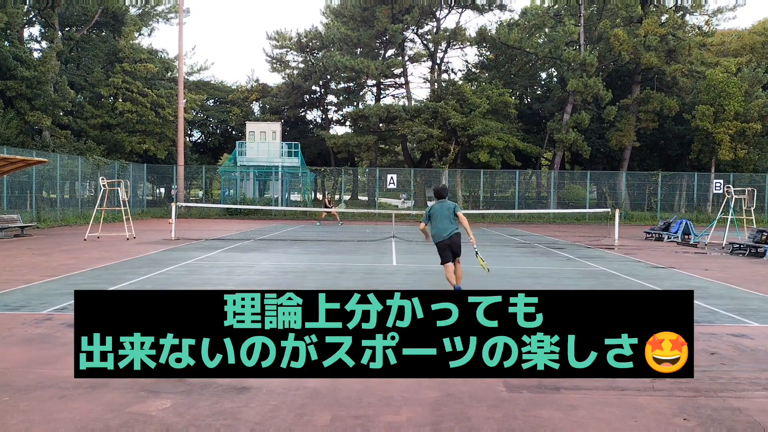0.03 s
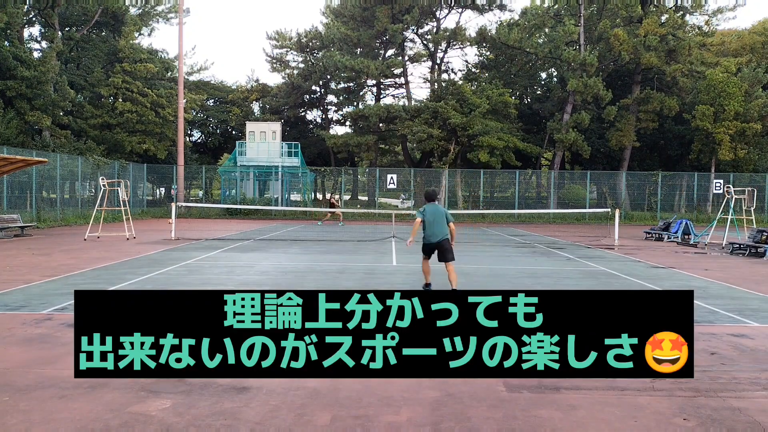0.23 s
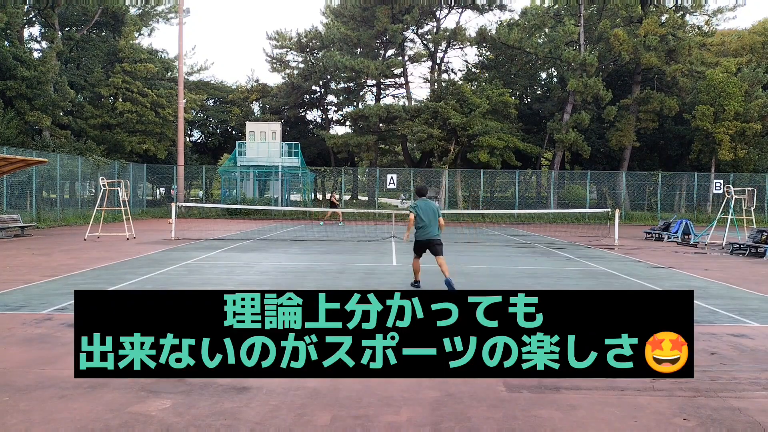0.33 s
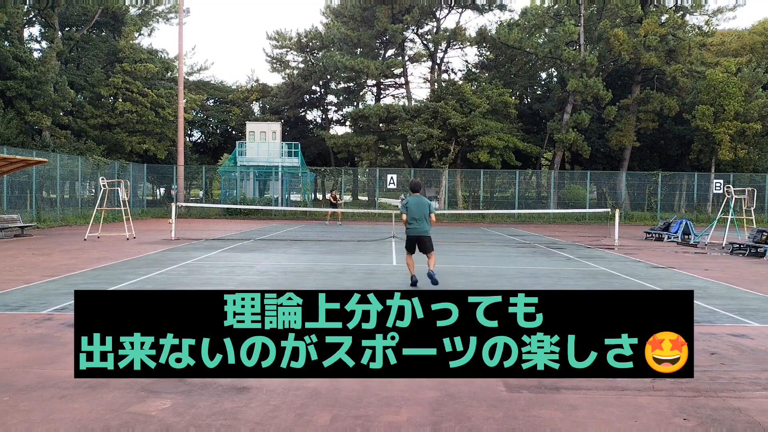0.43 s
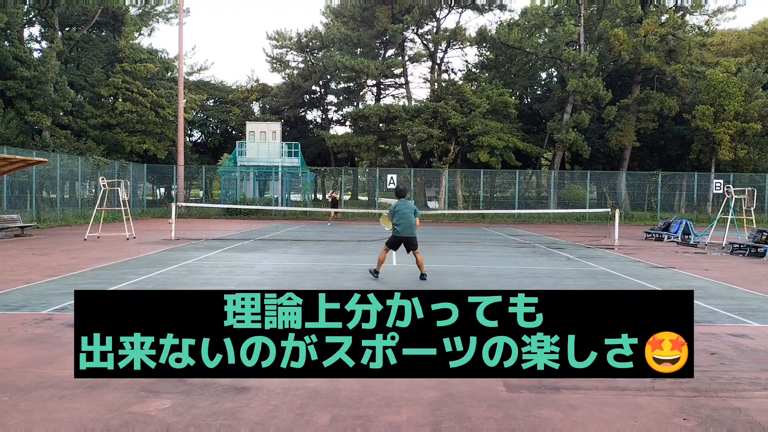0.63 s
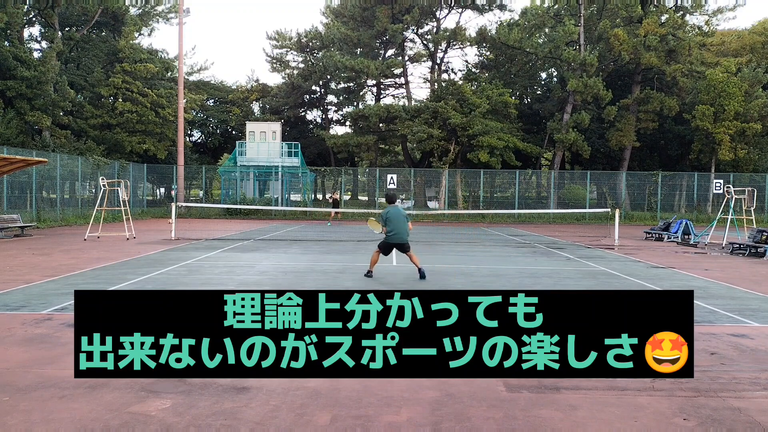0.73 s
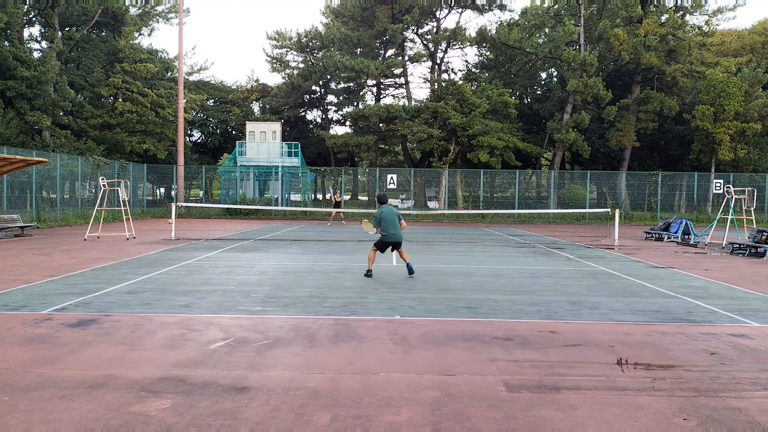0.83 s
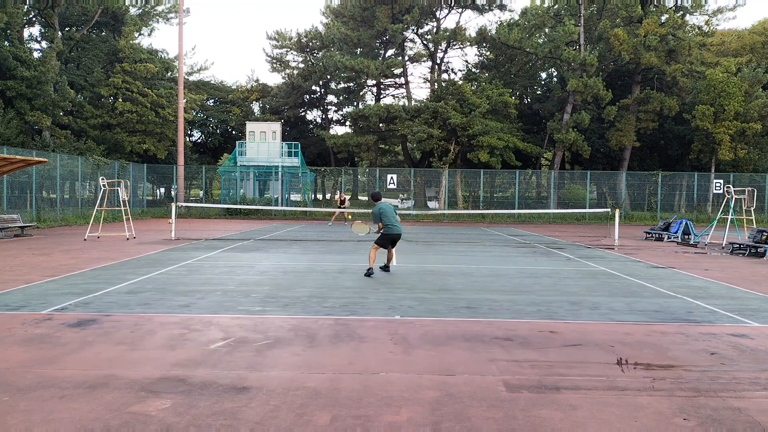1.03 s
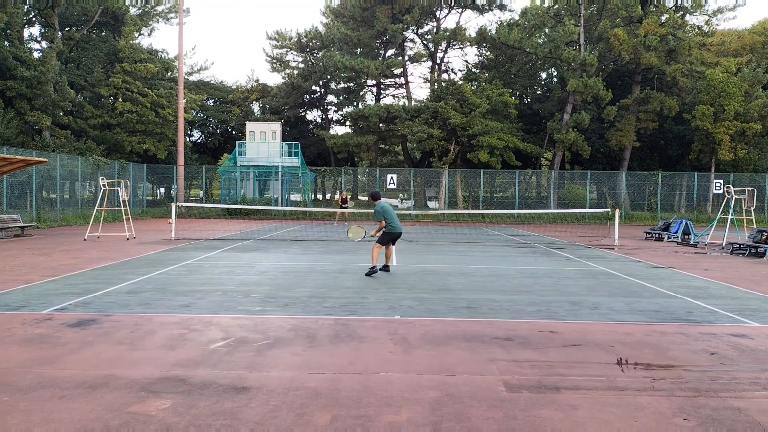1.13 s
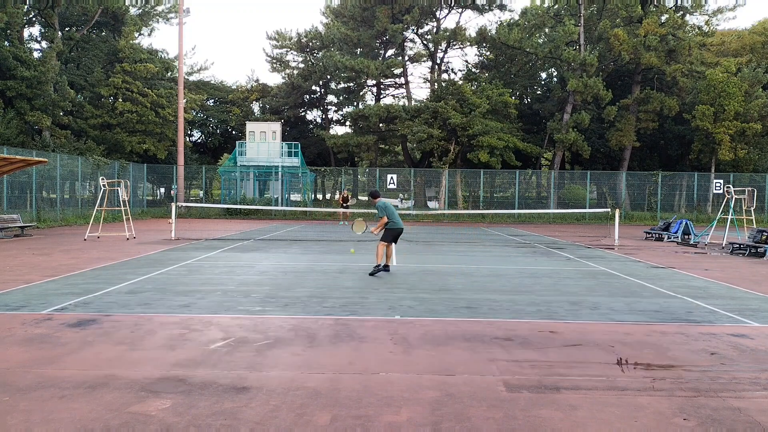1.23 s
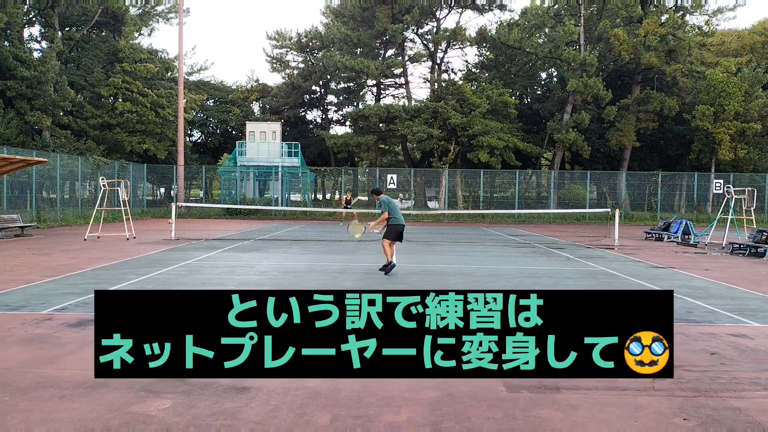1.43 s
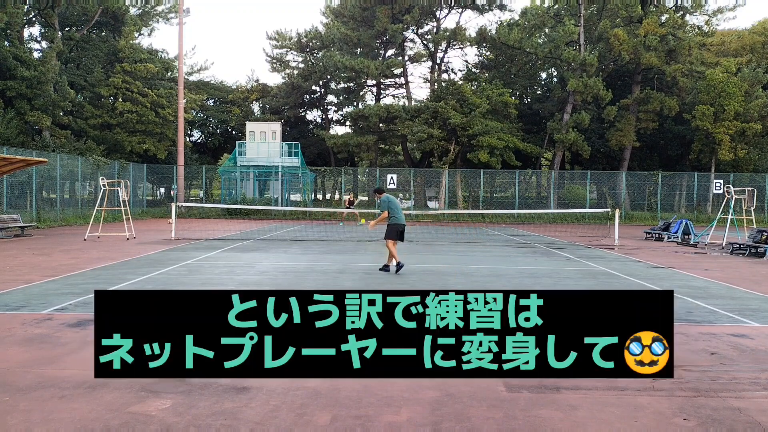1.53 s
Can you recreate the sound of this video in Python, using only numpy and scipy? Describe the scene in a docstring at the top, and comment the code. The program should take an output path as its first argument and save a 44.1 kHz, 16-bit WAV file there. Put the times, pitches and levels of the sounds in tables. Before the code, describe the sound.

A tennis ball is struck at the far end of an outdoor hard court. Nearer shoes land with knocks and brief squeaks, the ball bounces, and a closer racket returns it with an echoing pop. Cicadas buzz faintly.

```python
"""A tennis ball is hit back and forth on an outdoor hard court ringed by trees. The far player drives
it, it bounces, and the near player slices it back; each hit is a thump, a crack of felt and a short
ring of ball and strings. The near player lands from a hop with knocking, squeaking, scuffing shoes,
and a ball bounces on another court. The hits echo from the fence and the trees, the shoes from the
trees alone. Cicadas buzz over a low, distant rumble."""
import sys
import numpy as np
from scipy import signal
from scipy.fft import rfft, irfft
from scipy.io import wavfile

SR = 44100
rng = np.random.default_rng(int(sys.argv[2]) if len(sys.argv) > 2 else 0)


def unload_audio(sound):
    """Save the sound as a 16-bit wav file, at the path given as the first command line argument."""
    columns = np.transpose(np.atleast_2d(sound))
    # keep every value between -1 and 1, then stretch to whole-number steps
    steps = np.round(np.clip(columns, -1, 1) * 32767)
    wavfile.write(sys.argv[1], SR, steps.astype(np.int16))


N = 70560
T = np.arange(N) / SR
FREQS_HZ = np.fft.rfftfreq(N, 1 / SR)
TOP_CUT_HZ = 15450

# Tone of the distant rumble and leaves: pitch_hz, level_db
RUMBLE_TONE = [(24, -25), (50, -5.5), (90, -4), (180, 1.5), (270, -3.5), (400, -10.5), (650, -13),
               (950, -12), (1300, -21), (2100, -30), (2900, -30), (5000, -35), (6500, -46.5), (9000, -42),
               (15000, -51)]
# Bands the cicadas sing in: pitch_hz, width_hz, level_db
CICADA_BANDS = [(3634, 474, -68), (3903, 327, -67.5), (4756, 1300, -76), (5250, 930, -78.5)]
# Sound scattered by the trees (a fade is the time to drop 60 dB): pitch_hz, level_db, fade_s
TREE_BANDS = [(100, -2.5, 0.36), (257, 3.5, 0.78), (407, -10, 0.51), (606, 0.5, 0.9), (782, 8, 0.57),
              (980, -4, 0.89), (1460, 7.5, 0.38), (2020, 2, 0.75), (2720, -1, 1.22), (4680, -2.5, 0.77),
              (7000, -3, 0.87), (9500, -8, 0.25), (14900, -17, .2)]
# Tone of the echo from the far tree line: pitch_hz, level_db
FAR_ECHO_TONE = [(200, -20), (350, -6), (600, -19.5), (800, -5), (940, 10.5), (1120, -0.5), (1600, -15),
                 (2800, -32), (6000, -41)]
# Soles brushing the court: start_s, length_s, level_db
SCUFF_EVENTS = [(0, 0.044, -63), (0.037, 0.057, -75), (.364, 0.027, -65.5), (0.443, 0.023, -69.5),
                (0.723, 0.057, -85.5), (0.929, 0.2, -84.5), (1.104, 0.13, -84)]
# Tone of a sliding sole: pitch_hz, level_db
SCUFF_TONE = [(1500, -5), (4000, -1.5), (6500, -4.5), (8300, -2), (10500, -5.5), (15000, -7.5)]
# Rubber squeaks: start_s, length_s, start_pitch_hz, end_pitch_hz, level_db, tree_echo_db
SQUEAK_EVENTS = [(0.0595, .0068, 5180, 4330, -43.5, -5), (0.373, 0.005, 4506, 4765, -35.5, -7.5),
                 (0.417, 0.036, 7980, 8400, -73, -1), (0.4524, 0.0053, 8400, 8750, -53.5, 0)]
# A squeak's tones at 1, 2 and 3 times its pitch: level_db
SQUEAK_HARMONICS = [0, -12, -30]
# Heels and soles landing: start_s, knock_db, brightness_hz, grit_db
STEP_EVENTS = [(0.3653, -61, 2500, -44.5), (0.3924, -43, 1500, -50.5), (0.396, -31, 614, -51),
               (.4436, -62, 2000, -54), (0.4717, -31.5, 2240, -46), (0.4765, -29, 730, -42.5),
               (0.7447, -56.5, 1180, -82), (.796, -58.5, 2200, -75), (1.455, -42.5, 246, -74)]
# Notes a shoe rings with: pitch_hz, level_db, rise_s, fade_s
SHOE_NOTES = [(125.5, -11, 0.0049, .04), (292, -9, 0.00297, 0.009), (428, 2.5, 0.00092, 0.016),
              (788, 0, 0.0018, 0.012), (1090, -0.5, 0.00092, 0.019)]
# Tone of grit crushed underfoot: pitch_hz, level_db
GRIT_TONE = [(200, 6), (1400, -4.5), (2000, -8), (2800, -3), (4500, -20), (6500, -22), (10000, -39),
             (15500, -51)]
# Notes of each kind of hit, a low thump and a higher ring, each with its own small delay:
# pitch_hz, level_db, delay_s, rise_s, fade_s
FAR_RACKET_NOTES = [(228, -45, 0.0036, 0.0051, 0.013), (394, -24, 0, 0.0018, 0.024),
                    (875, -27, 0, 0.0058, 0.0063), (979, -26, .0038, 0.0017, 0.017),
                    (1063, -35.5, 0.0048, 0.0024, 0.016), (1360, -43.5, 0.0071, 0.0029, 0.016),
                    (2965, -35, 0.0013, 0.0012, 0.01), (6680, -52, .0003, 0.00036, 0.013),
                    (7600, -57.5, .0003, 0.0017, 0.014)]
NEAR_RACKET_NOTES = [(242, -36, 0.00021, 0.0033, 0.034), (313, -27, .0005, 0.001, 0.019),
                     (710, -38, 0.0016, 0.0022, 0.05), (850, -33, 0.00093, 0.0016, 0.026),
                     (1760, -43, 0.00061, 0.0014, 0.035), (2352, -46, 0.0000007, 0.0011, 0.033),
                     (2804, -48.5, 0.0041, 0.0019, 0.027), (7120, -52.5, 0.0016, 0.00063, 0.0064),
                     (8120, -50, 0.00078, 0.0016, 0.0064)]
BOUNCE_NOTES = [(227, -48, 0.0015, 0.0031, .025), (1010, -48.5, 0, 0.0014, 0.034),
                (1155, -54.5, 0, 0.00087, 0.077)]
# Tone of the crack of the ball's felt: pitch_hz, level_db
CRACK_TONE = [(300, -9), (1200, 10.5), (2000, 0.5), (3600, 11), (5000, -0.5), (8000, -8.5), (11000, -15.5),
              (15500, -25)]
# The far stroke, a bounce on another court, the bounce on this one and the near stroke:
# start_s, ring_db, crack_db, tree_echo_db, fence_echo_db, far_echo_db
BALL_HITS = [(0.2409, 0.5, -51, -4.5, -28, -26), (0.742, -5.5, -77, -22, -26, -28),
             (0.9781, 1.5, -68, -23, -31, -46), (1.2211, -1, -49, -17.5, -19, -6.5)]


def from_db(db):
    """Turn decibels into a number to multiply by."""
    return 10 ** (np.asarray(db) / 20)


def unit_level(x):
    """Scale a sound to an average (rms) level of 1."""
    return x / np.sqrt(np.mean(x ** 2) + 1e-20)


def shape_tone(x, tone):
    """Make each pitch louder or softer, following a tone table."""
    pitch_hz, level_db = np.transpose(tone)
    curve_db = np.interp(np.log(FREQS_HZ + 1), np.log(pitch_hz), level_db)
    return irfft(rfft(x) * from_db(curve_db), N)


def noise(tone):
    """Noise with the given tone and a level of 1."""
    return unit_level(shape_tone(rng.standard_normal(N), tone))


def cut_treble(x, hz):
    """Soften everything above a pitch."""
    return signal.sosfilt(signal.butter(2, hz, fs=SR, output="sos"), x)


def cut_bass(x, hz):
    """Soften everything below a pitch: small objects give off little bass."""
    return signal.sosfilt(signal.butter(2, hz, "high", fs=SR, output="sos"), x)


def drift(rate_hz):
    """A smooth random wobble with a typical size of 1."""
    return unit_level(cut_treble(rng.standard_normal(2 * N), rate_hz)[N:])


def rise_and_fade(start_s, rise_s, fade_s):
    """A loudness curve that swells, then drops 60 dB every fade_s."""
    age_s = np.maximum(T - start_s, 0)
    rise = np.sin(np.pi / 2 * np.minimum(age_s / rise_s, 1)) ** 2
    fade = np.exp(-np.log(1000) * np.maximum(age_s - rise_s, 0) / fade_s)
    return rise * fade


def ring(start_s, notes):
    """A struck object rings with several pure notes, each fading at its own speed."""
    out = 0
    for pitch_hz, level_db, delay_s, rise_s, fade_s in notes:
        onset_s = start_s + delay_s
        wave = np.sin(2 * np.pi * pitch_hz * (onset_s - T))
        out += from_db(level_db) * rise_and_fade(onset_s, rise_s, fade_s) * wave
    return out


def echo(x, pattern):
    """The echo of a sound, given the pattern that a single click would send back."""
    return signal.fftconvolve(x, pattern)[:N]


def rumble(level_db=-65.5):
    """A steady distant rumble with a faint hiss of leaves."""
    return from_db(level_db) * noise(RUMBLE_TONE)


def cicadas(beat_hz=105.5, beat_depth=0.21, swell_db=1.5):
    """Many insects blur into bands of noise that throb as their drum-like skins beat."""
    out = 0
    for pitch_hz, width_hz, level_db in CICADA_BANDS:
        rate_hz = beat_hz * (1 + 0.221 * drift(27.2))
        beat = np.sin(2 * np.pi * np.cumsum(rate_hz) / SR)
        buzz = rng.standard_normal(N) * (1 + beat_depth * beat)
        off_pitch = (FREQS_HZ - pitch_hz) / (width_hz / 2)
        song = irfft(rfft(buzz) / (1 + off_pitch ** 2 / 2) ** 2, N)
        out += unit_level(song) * from_db(level_db + swell_db * drift(1.7))
    return out


def far_tree_pattern():
    """The far tree line sends back a slow, hollow echo."""
    hollow = shape_tone(rng.standard_normal(N), FAR_ECHO_TONE)
    return hollow * rise_and_fade(start_s=0.022, rise_s=0.041, fade_s=0.68) / np.sqrt(SR / 10)


def tree_pattern(early_db=1.5, early_at_s=0.011, early_width_s=0.042):
    """Trees scatter sound into a wash that fades band by band, with a lift for the first echoes."""
    pitch_hz, level_db, fade_s = np.transpose(TREE_BANDS)
    spectrum = rfft(rng.standard_normal(N))
    wash = 0
    for k, this_band in enumerate(np.eye(len(pitch_hz))):
        share = np.interp(np.log(FREQS_HZ + 1), np.log(pitch_hz), this_band)
        band = irfft(spectrum * share, N)
        wash += from_db(level_db[k]) * band * rise_and_fade(0, rise_s=0.0017, fade_s=fade_s[k])
    lift_db = early_db * np.exp(-((T - early_at_s) / early_width_s) ** 2)
    return wash * from_db(lift_db) / np.sqrt(SR / 10)


def fence_pattern(delay_s=0.0676, smear_s=0.0073):
    """The fence sends back one dull, smeared echo."""
    dull = cut_treble(rng.standard_normal(N), hz=1500)
    return dull * np.exp(-((T - delay_s) / smear_s) ** 2) / np.sqrt(SR * smear_s)


def scuffs(trees, rise_share=0.19, fall_share=0.64, grain_db=2.5, tree_echo_db=-4):
    """Soles slide over sand with a bright, grainy hiss that fades as the foot slows."""
    loudness = 0
    for start_s, length_s, level_db in SCUFF_EVENTS:
        progress = np.clip((T - start_s) / length_s, 0, 1)
        ramp = np.minimum(progress / rise_share, (1 - progress) / fall_share)
        loudness += from_db(level_db) * np.minimum(ramp, 1)
    hiss = loudness * noise(SCUFF_TONE) * from_db(grain_db * drift(320))
    return hiss + from_db(tree_echo_db) * echo(hiss, trees)


def squeaks(trees, wobble_share=0.008, reflection_s=0.006, reflection_db=-16.5):
    """Rubber sticks and slips, making a brief, unsteady, gliding tone with a quick reflection."""
    out = 0
    for start_s, length_s, start_hz, end_hz, level_db, tree_echo_db in SQUEAK_EVENTS:
        progress = np.clip((T - start_s) / length_s, 0, 1)
        pitch_hz = (start_hz + (end_hz - start_hz) * progress) * (1 + wobble_share * drift(700))
        phase = 2 * np.pi * np.cumsum(pitch_hz) / SR
        tone = sum(from_db(db) * np.sin(k * phase)
                   for k, db in enumerate(SQUEAK_HARMONICS, 1) if k * end_hz < TOP_CUT_HZ)
        chirp = from_db(level_db) * np.sin(np.pi * progress) ** 2 * tone
        reflection = from_db(reflection_db) * np.roll(chirp, int(reflection_s * SR))
        out += chirp + reflection + from_db(tree_echo_db) * echo(chirp, trees)
    return out


def footsteps(trees, tree_echo_db=-7.5):
    """Heel and sole knock on the court and crush grit; each contact has its own brightness."""
    steps = 0
    for start_s, knock_db, brightness_hz, grit_db in STEP_EVENTS:
        notes = [(hz, db - 20 * np.log10(1 + (hz / brightness_hz) ** 2), 0, rise_s, fade_s)
                 for hz, db, rise_s, fade_s in SHOE_NOTES]
        grit = noise(GRIT_TONE) * rise_and_fade(start_s, rise_s=0.00077, fade_s=0.037)
        steps += from_db(knock_db) * ring(start_s, notes) + from_db(grit_db) * grit
    return cut_bass(steps + from_db(tree_echo_db) * echo(steps, trees), hz=110)


def ball_hits(trees, crack_echo_boost_db=8):
    """The ball meets strings or court: its felt cracks, and the contact thumps and rings."""
    fence, far_trees = fence_pattern(), far_tree_pattern()
    notes_per_hit = (FAR_RACKET_NOTES, BOUNCE_NOTES, BOUNCE_NOTES, NEAR_RACKET_NOTES)
    out = 0
    for (start_s, ring_db, crack_db, tree_db, fence_db, far_db), notes in zip(BALL_HITS, notes_per_hit):
        burst = rise_and_fade(start_s, rise_s=0.00077, fade_s=0.046)
        crack = from_db(crack_db) * noise(CRACK_TONE) * burst
        hit = from_db(ring_db) * ring(start_s, notes) + crack
        surroundings = from_db(tree_db) * trees + from_db(fence_db) * fence + from_db(far_db) * far_trees
        crack_echo = from_db(tree_db + crack_echo_boost_db) * echo(crack, trees)
        out += hit + echo(hit, surroundings) + crack_echo
    return cut_bass(out, hz=162)


def scene():
    """Ball, shoes and background, added into one channel."""
    trees = tree_pattern()
    rally = ball_hits(trees) + footsteps(trees) + squeaks(trees) + scuffs(trees)
    return (rally + cicadas() + rumble())[None]


def record(dry):
    """Cut off the very highest treble steeply."""
    return signal.sosfilt(signal.ellip(10, .1, 70, TOP_CUT_HZ, fs=SR, output="sos"), dry)


dry = scene()
out = record(dry)
unload_audio(out)
```